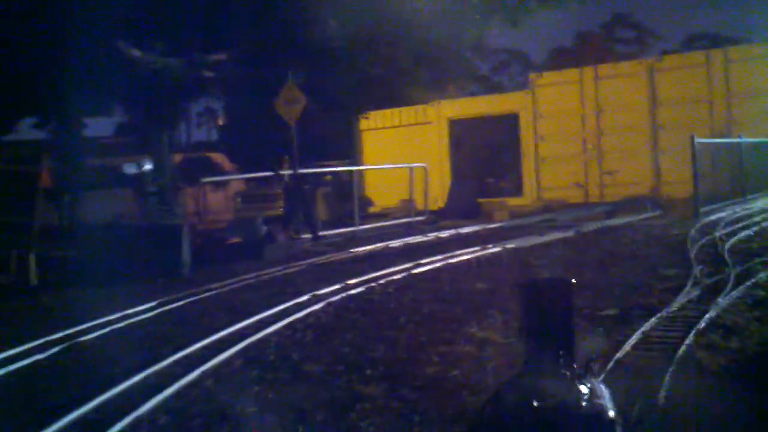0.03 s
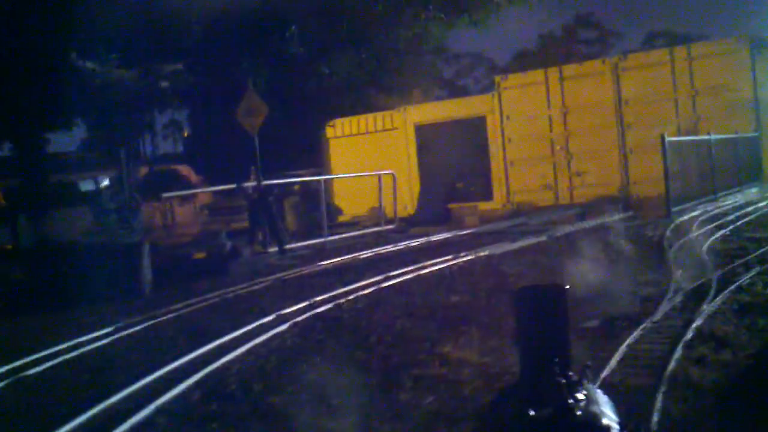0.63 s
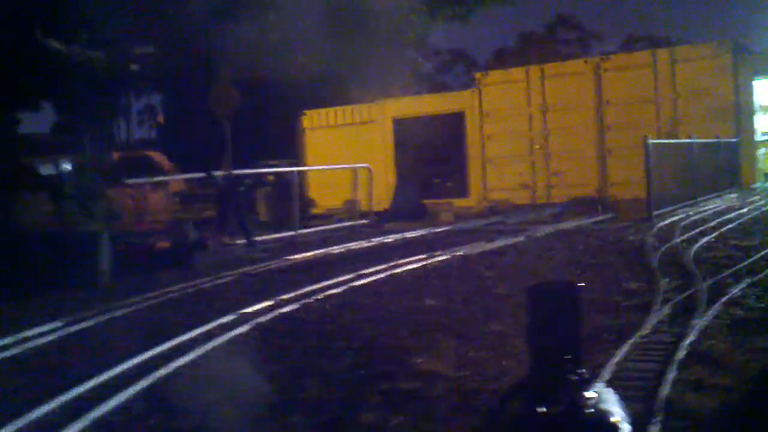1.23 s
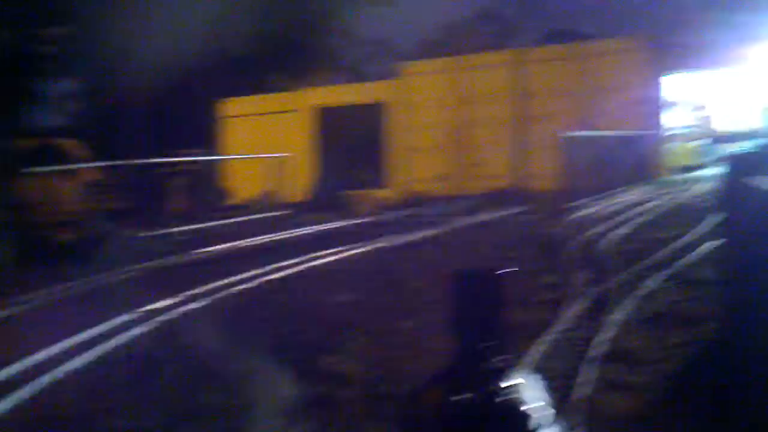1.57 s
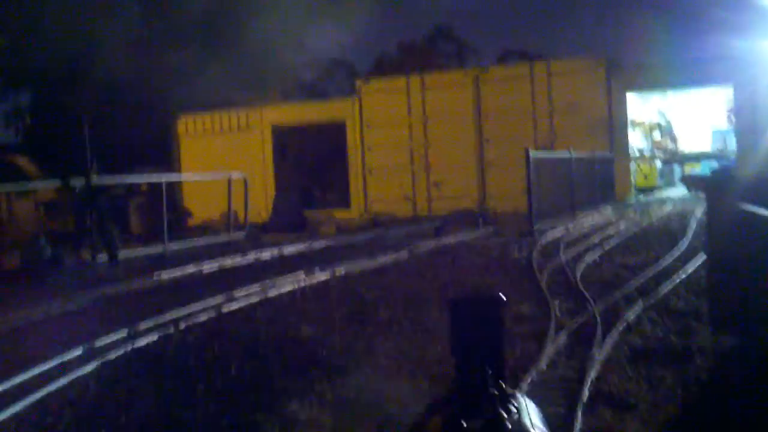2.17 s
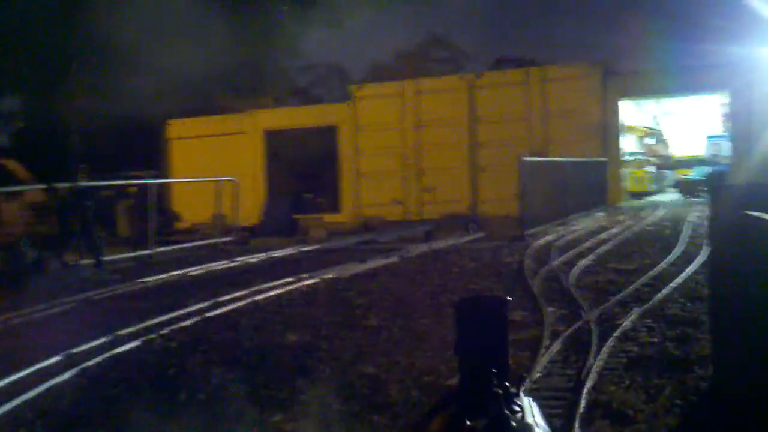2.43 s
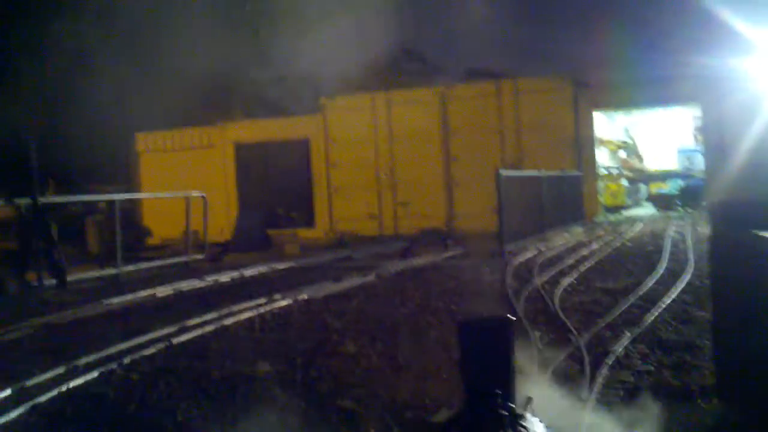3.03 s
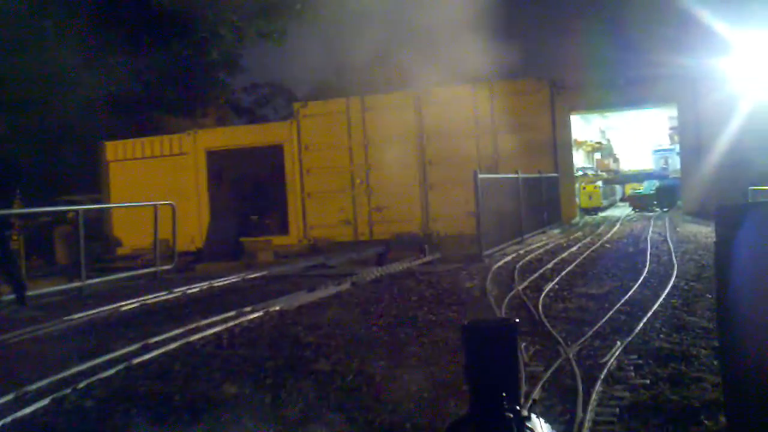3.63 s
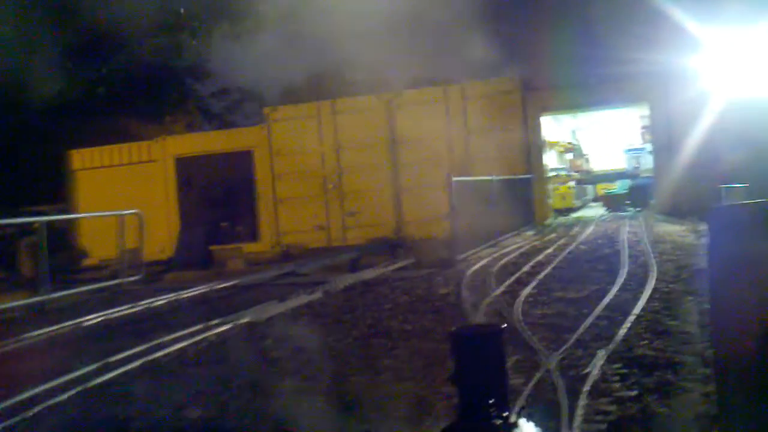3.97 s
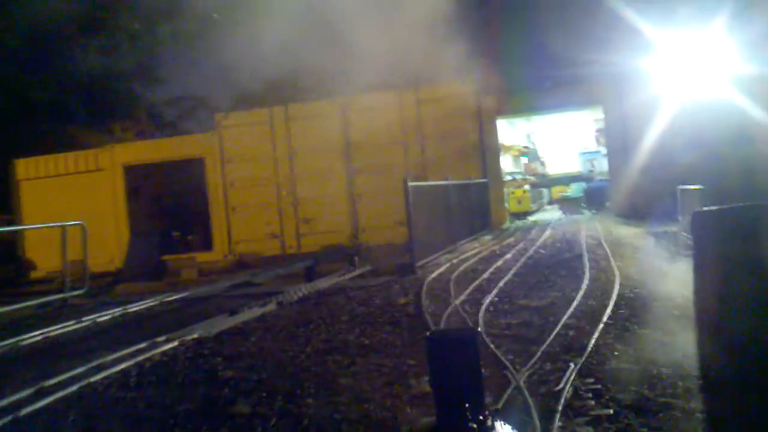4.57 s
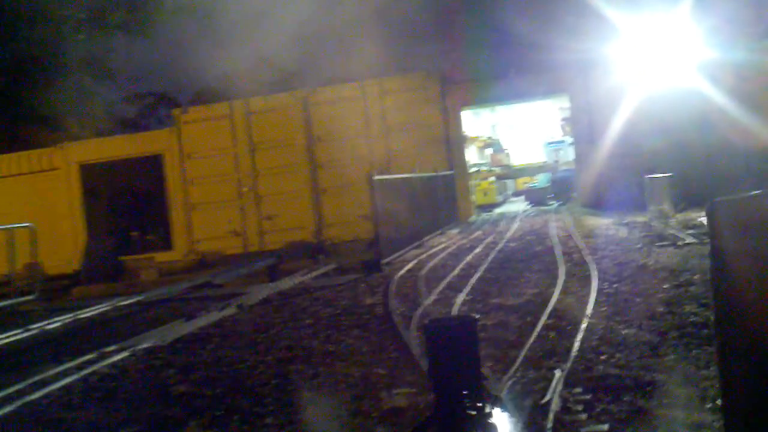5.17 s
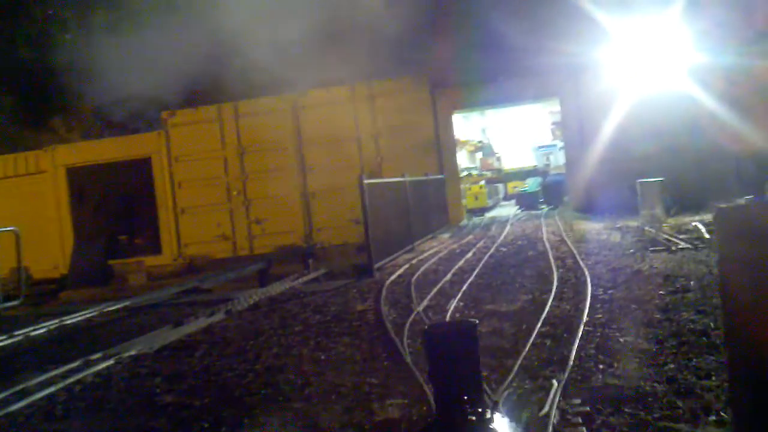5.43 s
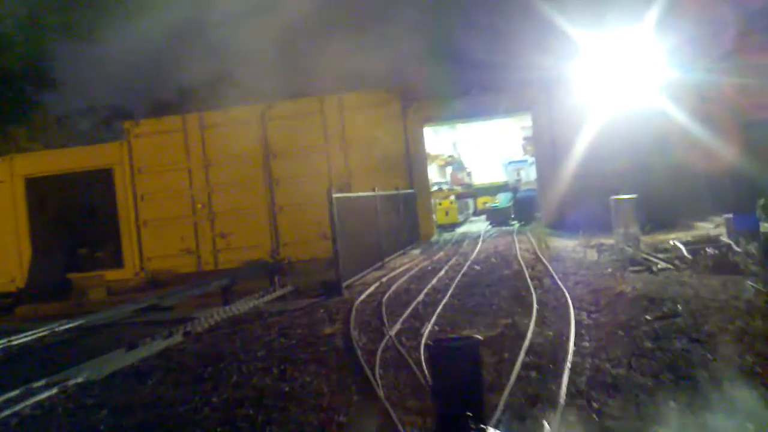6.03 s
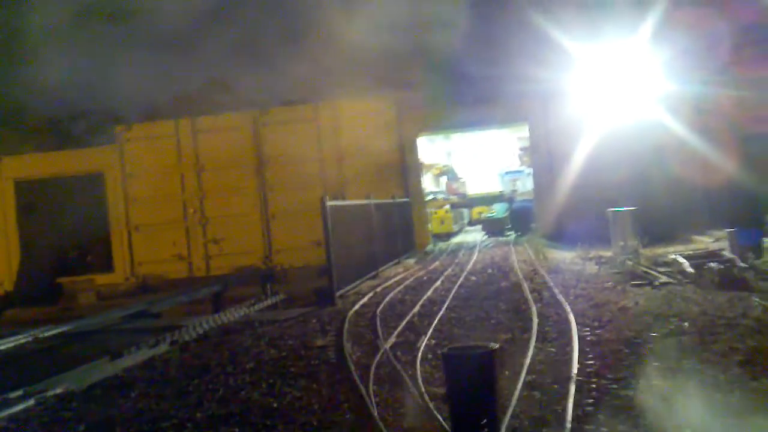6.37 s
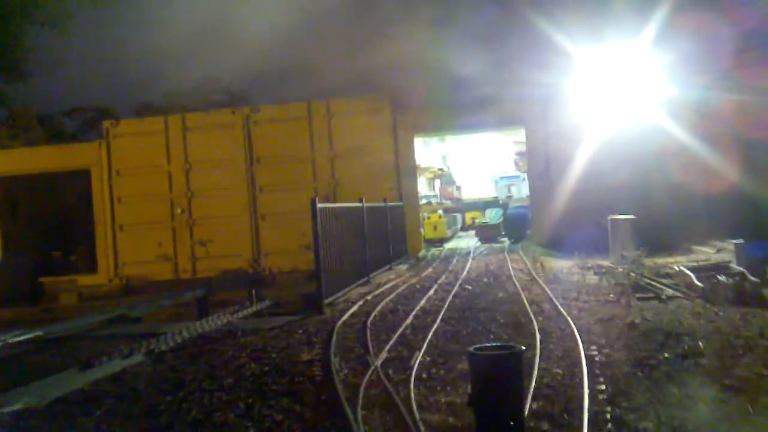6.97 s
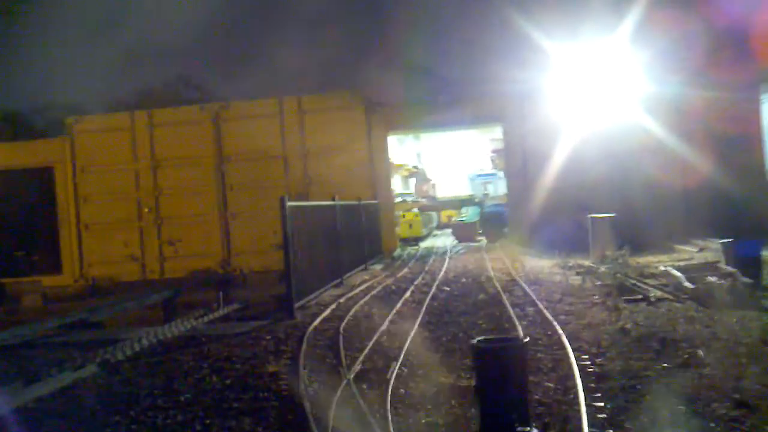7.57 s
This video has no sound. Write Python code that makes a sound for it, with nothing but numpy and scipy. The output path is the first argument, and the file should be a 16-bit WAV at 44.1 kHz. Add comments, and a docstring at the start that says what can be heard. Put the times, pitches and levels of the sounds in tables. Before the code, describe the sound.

A miniature steam locomotive chuffs along, speeding into a rapid run and slowing again, over hissing steam, rumbling wheels and metallic knocks.

```python
"""A rail yard at night, just behind the boiler of a miniature steam locomotive rolling along the track.
Each piston stroke blows a chuff of steam up the ringing chimney, slowly at first, then in a fast run,
then slowly again. Steam hisses on between the chuffs, uneven rails make the wheels rumble, and loose
rods knock on the frame. The yard throws back a short echo of the chuffs and knocks."""
import sys
import numpy as np
from scipy import signal
from scipy.fft import rfft, irfft
from scipy.io import wavfile
from scipy.ndimage import uniform_filter1d

SR = 44100
rng = np.random.default_rng(int(sys.argv[2]) if len(sys.argv) > 2 else 0)


def master_out(mix):
    """Clip the mix to full scale and print it as 16-bit PCM to the path in sys.argv[1]."""
    frames = np.transpose(np.atleast_2d(mix))
    ceiling = np.clip(frames, -1, 1)
    pcm = np.round(ceiling * 32767).astype(np.int16)
    wavfile.write(sys.argv[1], SR, pcm)


N = 344410
TIME = np.arange(N) / SR
FILTER_HZ = np.fft.rfftfreq(2 ** 13, 1 / SR)

# one row for each piston stroke, two valves taking turns: start_s, level_db
STROKES = [(0, -23), (0.12, -23.5), (0.254, -24.5), (0.415, -21), (0.544, -23), (0.737, -24),
           (0.928, -21.5), (1.114, -20), (1.296, -25.5), (1.557, -21), (1.786, -22), (2.014, -20.5),
           (2.309, -24), (2.67, -20), (2.914, -20), (3.093, -17.5), (3.18, -19), (3.285, -21.2),
           (3.377, -20), (3.488, -19), (3.585, -21.5), (3.705, -20), (3.805, -21), (3.924, -18.6),
           (4.017, -21), (4.127, -19.5), (4.215, -19.5), (4.314, -18), (4.398, -21), (4.501, -22),
           (4.599, -21), (4.707, -19), (4.797, -21), (4.905, -19.5), (4.989, -20), (5.087, -18.2),
           (5.173, -20.5), (5.278, -20.5), (5.364, -21.5), (5.462, -18.6), (5.551, -22.5), (5.678, -22),
           (5.812, -22.5), (5.943, -19.5), (6.042, -22), (6.196, -20.6), (6.341, -20.5), (6.475, -19.5),
           (6.563, -20.5), (6.662, -20.5), (6.752, -22), (6.863, -19.5), (6.977, -25.5), (7.187, -25),
           (7.403, -23), (7.579, -17.8), (7.771, -24)]


def gain_of(db):
    """Turns decibels into a number to multiply by."""
    return 10 ** (np.asarray(db) / 20)


def evened(x):
    """Scales a signal to an average power of one."""
    return x / np.sqrt(np.mean(x ** 2) + 1e-20)


def at_pitch(table, hz):
    """Reads between the rows of a table, giving each octave equal room."""
    pitches, values = np.transpose(table)
    return np.interp(np.log(hz + 1), np.log(pitches + 1), values)


def wander(hz):
    """A smooth random curve that moves up to about hz times a second."""
    t = np.linspace(0, N / SR, 2 ** 12)
    keep_slow = np.exp(-(np.fft.rfftfreq(len(t), t[1]) / hz) ** 2)
    smooth = irfft(rfft(rng.standard_normal(len(t))) * keep_slow)
    return np.interp(TIME, t, evened(smooth))


def colour(x, db):
    """Makes some pitches stronger than others; any ringing comes after the sound that starts it."""
    log_gain = np.log(gain_of(np.r_[db, db[-2:0:-1]]))
    spectrum = np.exp(signal.hilbert(log_gain).conj())[:len(db)]
    ring = irfft(spectrum)[:len(db)]
    return signal.oaconvolve(x, ring[None] / np.linalg.norm(ring), axes=1)[:, :N]


def strokes():
    """Times each stroke: the slower the beat, the longer a cylinder takes to empty."""
    # a soft valve and a snappy one; each time grows or shrinks with the beat raised to its exponent:
    # opening_s, opening_exponent, emptying_s, emptying_exponent, throat_db
    valves = [(0.01, 1, 0.041, 0.3, -2.5), (.0058, -.55, .043, 0.75, .2)]
    # the low, throaty part of the chuff thins out late in the fast run: time_s, level_db
    bark = [(0, 1), (3.3, .5), (4.1, -1), (4.7, 0.5), (5.0, -2.5), (5.5, -4.3), (5.9, 0), (6.5, 0.9),
            (7.8, 0)]
    beats = np.diff([s for s, db in STROKES]) / 0.1  # gaps between strokes, in tenths of a second
    for k, ((s, db), beat) in enumerate(zip(STROKES, np.r_[beats, beats[-1]])):
        opening_s, opening_exponent, emptying_s, emptying_exponent, throat_db = valves[k % 2]
        bark_db = throat_db + np.interp(s, *np.transpose(bark))
        yield s, db, opening_s * beat ** opening_exponent, emptying_s * beat ** emptying_exponent, bark_db


def steam_jet(flutter_db, patchy_db=2.0):
    """Noise whose strength and colour flutter as swirls and droplets leave the nozzle."""
    bands = signal.stft(rng.standard_normal((2, N)), nperseg=256)[2]
    patches = uniform_filter1d(rng.standard_normal(bands.shape[1:]), size=5, axis=0)  # smooth over pitch
    patches = evened(uniform_filter1d(patches, size=7, axis=1))  # and over time
    flutter = rng.standard_normal(bands.shape[-1])  # shared by all pitches
    bands *= gain_of(patchy_db * patches + flutter_db * flutter)
    return evened(signal.istft(bands)[1][:, :N])


def chimney(steam, jet_colour):
    """A jet of steam makes the chimney ring at its own pitches."""
    # ringing of the chimney and the smokebox under it: pitch_hz, width_hz, lift_db
    rings = [(242.5, 60, 9.5), (793, 96, 15.3), (1506, 67, 7), (2273, 143, 15.5), (2890, 295, 5.5),
             (3062, 91, 4.5), (3452, 163, 9), (4056, 110, 7.5), (4605, 220, 5.5), (5590, 510, 6),
             (6450, 200, 3), (7035, 220, 5), (7800, 110, 1.5), (9600, 1640, 4), (11060, 220, 4),
             (12400, 200, 2.5)]
    lift_db = sum(db / (1 + (2 * (FILTER_HZ - hz) / width) ** 2) for hz, width, db in rings)
    return colour(steam, at_pitch(jet_colour, FILTER_HZ) + lift_db)


def chuffs(hiss_db=3.5, throat_db=6.0, split_hz=2200, sag_s=0.079, crack=0.51, crack_s=0.0091):
    """A valve opens with a crack, the pressure sags, and the flow ends as the cylinder empties."""
    # colour of the blast before the chimney: pitch_hz, level_db
    blast_colour = [(30, -30), (60, -26.5), (110, -7), (450, -1), (550, -5.5), (700, -1), (1100, -8.5),
                    (1600, -2.5), (2050, -12.5), (5000, -12), (6100, -10), (6500, -5.5), (10000, -7.5),
                    (14000, -10)]
    hiss_power, throat_power = np.zeros(N), np.zeros(N)
    for s, db, opening_s, emptying_s, bark_db in strokes():
        span = slice(round(s * SR), round((s + .5) * SR))
        age = np.maximum(TIME[span] - s, 0)
        valve = 1 - np.exp(-(age / opening_s) ** 1.26)
        pressure = np.exp(-age / sag_s) * (1 + crack * np.exp(-age / crack_s))
        pressure /= np.sqrt(1 + (age / emptying_s) ** 4)
        flow = gain_of(db) * valve * pressure / np.max(valve * pressure)
        hiss_power[span] += flow ** 2
        throat_power[span] += (flow * gain_of(bark_db)) ** 2
    jet = steam_jet(flutter_db=0.38)
    low = signal.sosfiltfilt(signal.butter(3, split_hz, fs=SR, output="sos"), jet)
    hiss = gain_of(hiss_db) * np.sqrt(hiss_power) * (jet - low)
    throat = gain_of(throat_db) * np.sqrt(throat_power) * low
    blast = hiss + throat
    # the narrow pipe lets out less of the bass
    bass = signal.sosfiltfilt(signal.butter(2, 450, fs=SR, output="sos"), blast)
    return chimney(blast + (gain_of(-5) - 1) * bass, blast_colour)


def thumps(level_db=-10, pitch_hz=112, fade_s=0.016, snap_s=0.0047):
    """Each valve pushes out one low puff of air, louder the faster it snaps open."""
    pushes = np.zeros(N)
    for s, db, opening_s, *_ in strokes():
        pushes[round(s * SR)] = gain_of(db + level_db) / np.hypot(1, opening_s / snap_s)
    age = TIME[:SR // 10]
    puff = np.sin(2 * np.pi * pitch_hz * age) * np.exp(-age / fade_s)
    return signal.oaconvolve(pushes, puff)[:N]


def leak(level_db=3.0, waver_db=1.0):
    """Steam keeps escaping between strokes, more of it in the fast run."""
    # strength of the escaping steam: time_s, level_db
    leaking = [(0.0, -42), (0.3, -44.5), (2.06, -38), (2.67, -40), (3.28, -34), (5.29, -37), (5.61, -39.5),
               (6.29, -41.5), (6.57, -35.5), (6.85, -38), (7.05, -42), (7.81, -39.5)]
    # its colour before the chimney: pitch_hz, level_db
    leak_colour = [(30, -22), (60, -24), (110, -2.5), (450, -0.5), (550, -4), (700, -4.5), (1100, -2),
                   (1600, -9.5), (2050, -18), (5000, -20.5), (6100, -14.5), (6500, -13), (10000, -10),
                   (14000, -10.5)]
    flow_db = np.interp(TIME, *np.transpose(leaking)) + waver_db * wander(hz=14)
    return chimney(steam_jet(flutter_db=0) * gain_of(flow_db + level_db), leak_colour)


def wheels(level_db=-1.0, lumpy_db=1.5, shove_db=-14, lag_s=0.044, width_s=0.024):
    """Uneven rails shake the wheels into a lumpy rumble that swells as each stroke shoves the frame."""
    # strength of the wheels on the rails: time_s, level_db
    rolling_levels = [(0.0, -40), (1.0, -38.5), (1.24, -40), (2.74, -38), (3.28, -34), (3.67, -42),
                      (4.05, -44), (5.65, -40.5), (6.98, -38.5), (7.81, -36)]
    # colour of the rumble: pitch_hz, level_db
    rumble_colour = [(30, -20), (65, -33), (115, -18.5), (190, -8), (228, -0.5), (260, 1.7), (310, -8),
                     (450, -12), (600, -20), (1200, -25.5), (3000, -36)]
    rolling = gain_of(np.interp(TIME, *np.transpose(rolling_levels)) + level_db)
    shove_power = np.zeros(N)
    for s, db in STROKES:
        easing_db = -3 if s > 3.5 else 0  # the pistons shove less once the engine is under way
        swell = np.exp(-((TIME - s - lag_s) / width_s) ** 2)
        shove_power += gain_of(db + shove_db + easing_db) ** 2 * swell
    shaking = np.sqrt(rolling ** 2 + shove_power) * gain_of(lumpy_db * wander(hz=22))
    return colour(rng.standard_normal((2, N)) * shaking, at_pitch(rumble_colour, FILTER_HZ))


def loose_rods(knock_db=-2.5, rattle_db=-42, rattles_per_s=22, scrape_s=0.0041):
    """Loose rods and couplings strike the frame: a few clear knocks among small rattles."""
    # the clear knocks: start_s, level_db
    knocks = [(0.807, -11.5), (1.148, -16), (2.086, -11.5), (2.809, -16.5), (3.114, -13), (3.34, -17),
              (3.732, -12), (3.774, -22), (4.448, -19), (5.206, -15), (6.249, -16.5), (7.246, -13)]
    # ringing of the frame: pitch_hz, level_db, ring_s (time to fade by 60 dB)
    frame = [(258, -9, 0.13), (380, -4, 0.065), (455, 3, 0.083), (634, 1, 0.073), (780, 5.5, 0.16),
             (1120, -10, .05), (1492, 2, 0.066), (2300, -14, .03)]
    blows = (rng.random(N) < rattles_per_s / SR).astype(float)
    blows *= gain_of(rattle_db + 2.2 * np.minimum(rng.exponential(1, N), 3))
    blows *= rng.choice([-1, 1], N)
    for s, db in knocks:
        blows[round(s * SR)] += gain_of(db + knock_db)
    age = TIME[:SR // 2]
    ring = sum(gain_of(db - 60 * age / ring_s) * np.sin(2 * np.pi * hz * age) for hz, db, ring_s in frame)
    scrape = 0.5 * rng.standard_normal(len(age)) * np.exp(-age / scrape_s)
    return signal.oaconvolve(blows, ring / abs(ring).max() + scrape)[:N]


def echoes(delay_s=.022, echoes_per_s=2000):
    """Ground, walls and trees scatter the sound back to one spot; the deep bass lasts longest."""
    # how long the yard rings: pitch_hz, ring_s (time to fade by 60 dB)
    ring_times = [(100, 0.8), (250, 0.26), (800, 0.5), (3000, 0.4), (12000, 0.2)]
    # strength of the echo: pitch_hz, level_db
    echo_colour = [(70, -35), (240, -1), (450, -5), (800, -12.5), (2000, -22.5), (12000, -15.5)]
    bounces = rng.choice([-1., 1.], (2, SR // 2)) * (rng.random((2, SR // 2)) < echoes_per_s / SR)
    hz, age, bands = signal.stft(bounces, SR, nperseg=512)
    ring_s = at_pitch(ring_times, hz)[:, None]
    fading = gain_of(-60 * age / ring_s) * np.sqrt(np.log(1000) / ring_s)
    bands *= fading * gain_of(at_pitch(echo_colour, hz))[:, None]
    tail = signal.istft(bands, SR)[1] / np.linalg.norm(bounces[0])
    return np.pad(tail, ((0, 0), (int(delay_s * SR), 0)))


def yard(x, moves=6):
    """The echoes change as the engine rolls on from spot to spot."""
    out, step = np.zeros((2, N + 2 * SR)), N // moves + 1
    for centre in range(0, N + step, step):
        at = np.arange(max(centre - step, 0), min(centre + step, N))
        nearness = np.sqrt(np.maximum(1 - abs(at - centre) / step, 0))  # nearby spots share the power
        echo = signal.fftconvolve(x[:, at] * nearness, echoes(), axes=1)
        out[:, at[0]:at[0] + echo.shape[1]] += echo
    return out[:, :N]


def left_and_right(x):
    """Widens the sound: the sides move together below 2 kHz and swing in and out of step above.
    Row one of x is what they share, row two sets them apart."""
    # how alike the two sides are: pitch_hz, likeness (0 to 1)
    likeness = [(60, .6), (130, .94), (260, .92), (500, .92), (750, .99), (1750, .97), (2060, .6),
                (2300, .96), (2450, 1), (2780, 1), (3000, .5), (4000, .85), (4700, .55), (5250, .95),
                (6100, .7), (14000, .45)]
    # how far the left wave runs ahead: pitch_hz, lead_radians
    lead = [(0, 0), (1950, 0), (2250, -3.1), (2850, -3.1), (3100, .3), (3500, .8), (3900, 0), (4300, .6),
            (5000, 3.1), (5750, 3.6), (6200, 6.2), (7000, 6.9), (7700, 9.4), (14000, 25)]
    # how much louder the left side is: pitch_hz, difference_db
    balance = [(80, -12), (170, -2), (450, -3.5), (780, 3.5), (1100, -1.5), (2000, 1), (2300, -2.5),
               (2600, 0), (2950, 4), (3450, 1.5), (4000, 0), (14000, 0)]
    hz = np.fft.rfftfreq(N, 1 / SR)
    shared, apart = rfft(x)
    same = at_pitch(likeness, hz)
    sides = np.array([[1], [-1]])
    pair = np.sqrt((1 + same) / 2) * shared + sides * np.sqrt((1 - same) / 2) * apart
    pair *= gain_of(sides * at_pitch(balance, hz) / 2)
    pair *= np.exp(.5j * sides * np.interp(hz, *np.transpose(lead)))
    return irfft(pair, N)


def scene():
    """Chuffs, thumps and knocks echo in the yard, over leaking steam and rumbling wheels."""
    struck = np.array([thumps() + loose_rods(), np.zeros(N)])  # shared by both sides
    engine = chuffs() + struck
    return left_and_right(engine + yard(engine) + leak() + wheels())


def record(dry, low_cut_hz=82, high_cut_hz=13980):
    """Takes away the deepest bass and the highest treble."""
    low_cut = signal.butter(3, low_cut_hz, "high", fs=SR, output="sos")
    high_cut = signal.firwin(601, high_cut_hz, window=("kaiser", 8), fs=SR)
    return signal.oaconvolve(signal.sosfilt(low_cut, dry), high_cut[None], "same")


dry = scene()
out = record(dry)
master_out(out)
```